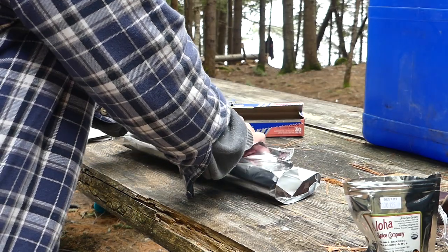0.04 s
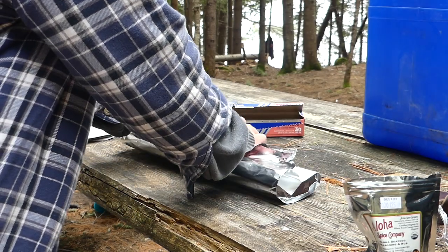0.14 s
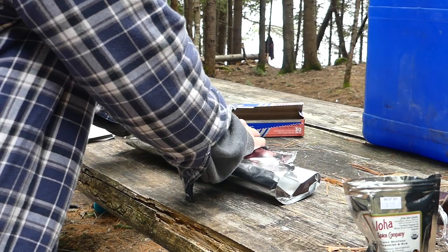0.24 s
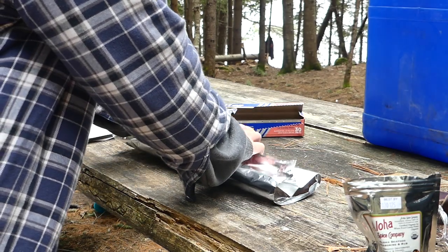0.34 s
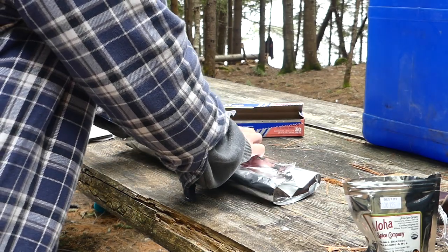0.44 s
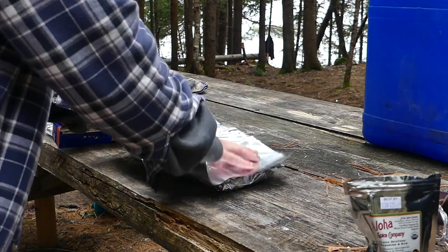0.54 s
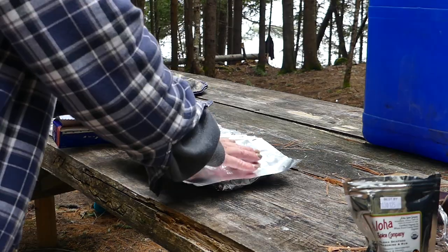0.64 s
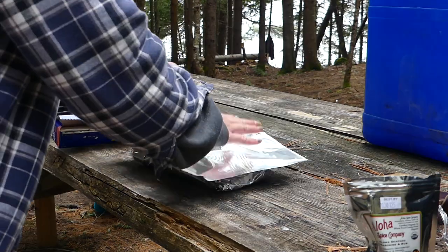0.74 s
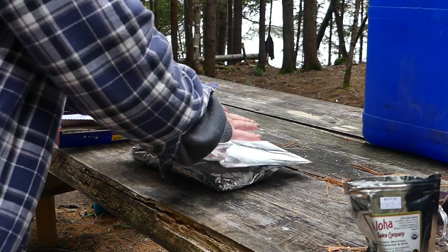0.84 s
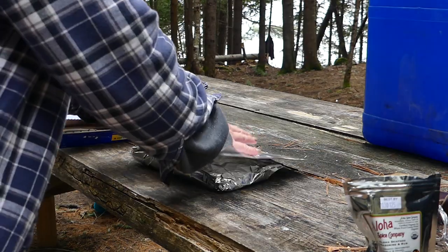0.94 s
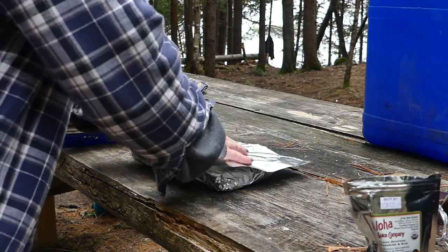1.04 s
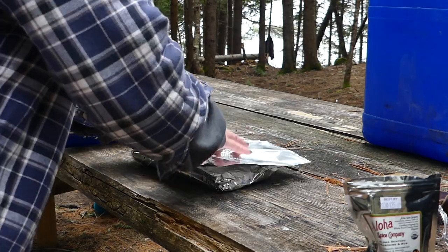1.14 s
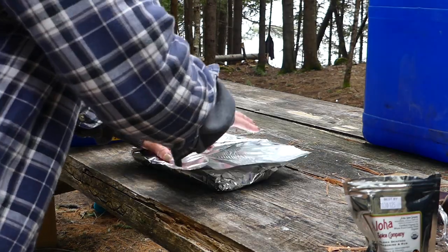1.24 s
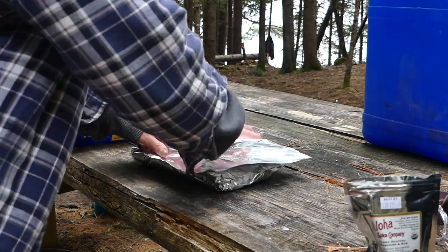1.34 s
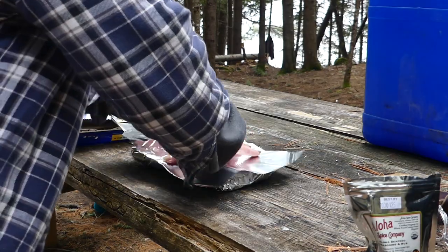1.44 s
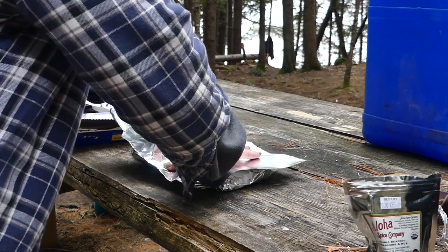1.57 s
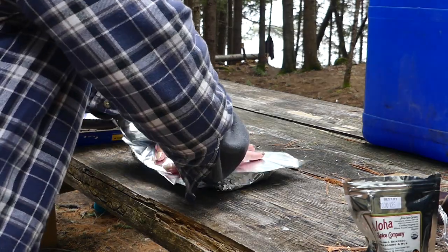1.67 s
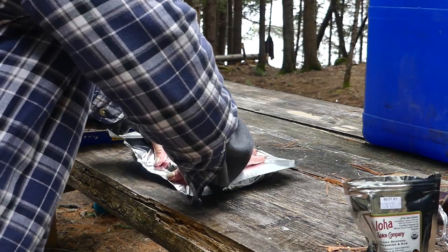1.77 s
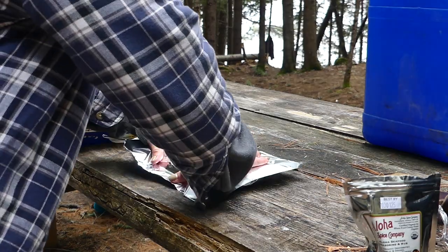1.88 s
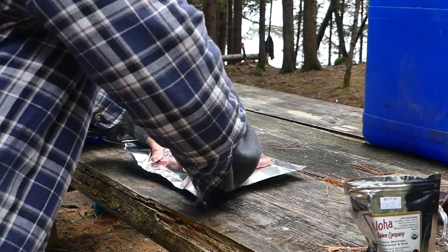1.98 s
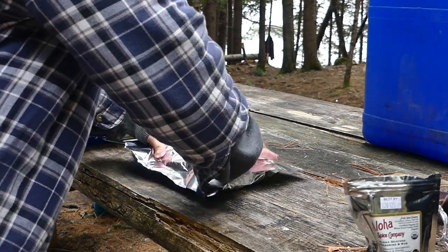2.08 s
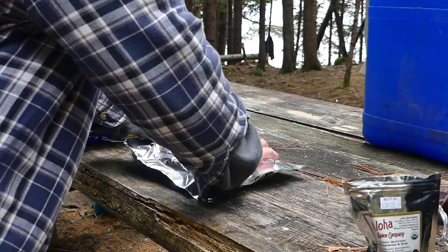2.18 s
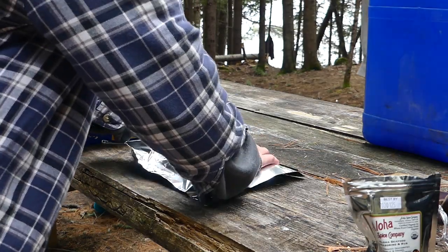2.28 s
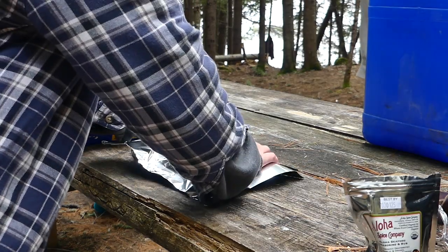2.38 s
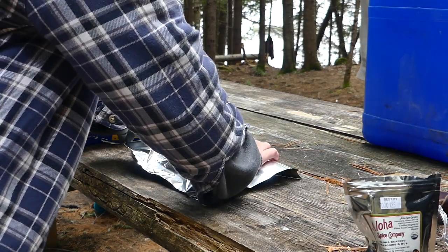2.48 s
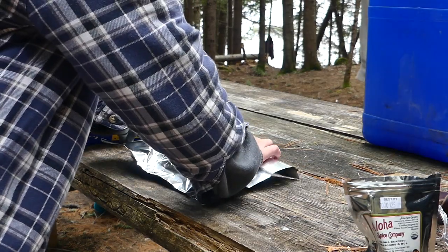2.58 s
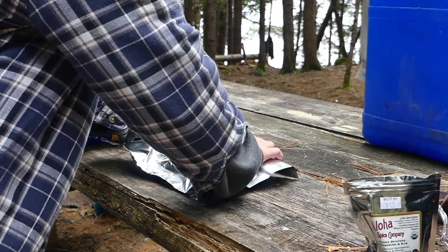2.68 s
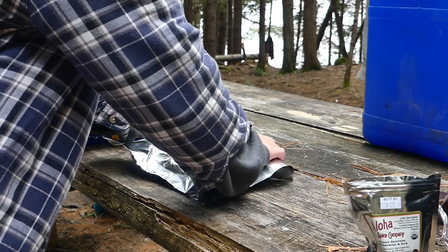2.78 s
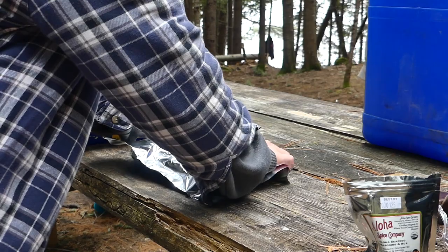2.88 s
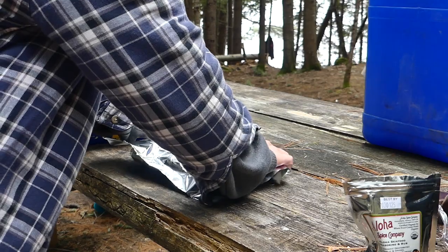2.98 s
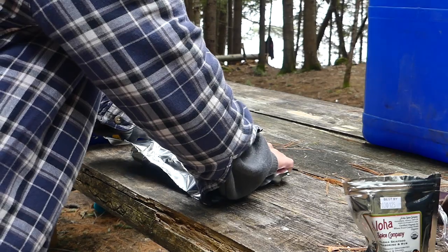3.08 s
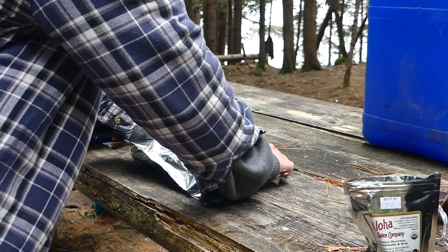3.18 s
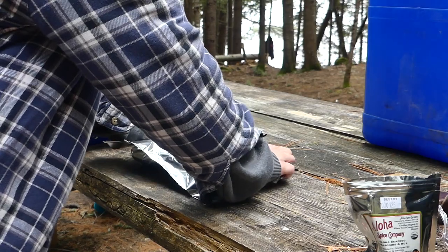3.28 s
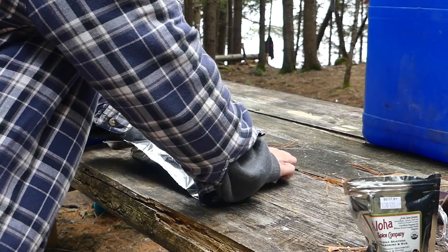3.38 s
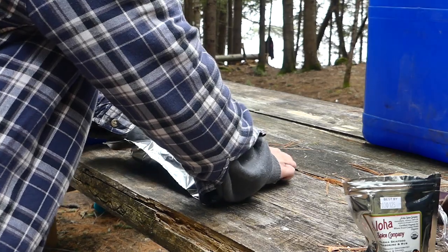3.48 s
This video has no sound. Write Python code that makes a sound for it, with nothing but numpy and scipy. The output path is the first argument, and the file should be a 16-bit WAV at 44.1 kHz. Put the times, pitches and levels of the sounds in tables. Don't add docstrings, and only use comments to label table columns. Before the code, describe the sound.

Aluminium foil crackles close to a nearly mono microphone outdoors. From 0 to 0.45 s, small tucks give duller crinkles, a sharp snap near 0.15 and hollow pops. After a brief lull, a bright sizzling rustle bursts at 0.5, with uneven smoothing strokes until 2.1. Folding then crackles, clicks and pings, with a hard crack at 2.43, softening from 3 to 3.5 over faint forest air and low wind rumble.

```python
import sys
import numpy as np
from scipy import signal
from scipy.fft import rfft, irfft
from scipy.io import wavfile
from scipy.ndimage import uniform_filter1d

SR = 44100
rng = np.random.default_rng(int(sys.argv[2]) if len(sys.argv) > 2 else 0)


def undo_db(level):
    steps = np.asarray(level, float) / 20
    return 10 ** steps


def unload_audio(sound):
    columns = np.transpose(np.atleast_2d(sound))
    steps = np.round(np.clip(columns, -1, 1) * 32767)
    wavfile.write(sys.argv[1], SR, steps.astype(np.int16))


N = 154350

# [f/Hz, level/dB]
AIR_SPECTRUM = [(35, -34), (60, -16.5), (579, -4), (1090, -4), (1550, -7), (2410, -8), (14200, -25.5),
                (16000, -50)]
# [t/s, length/s, start effort level/dB, end effort level/dB]
TUCK_STROKES = [
    (0.001, 0.067, -36, -36.5),
    (0.033, 0.044, -39.5, -33),
    (0.09, 0.023, -37.5, -37),
    (0.12, 0.021, -41, -28.5),
    (0.151, 0.048, -20.5, -50),
    (0.207, 0.05, -33.5, -37.5),
    (0.268, 0.078, -41, -30),
    (0.343, 0.084, -29, -36.5),
    (0.45, 0.08, -61, -54),
]
# [t/s, length/s, start effort level/dB, end effort level/dB]
SMOOTHING_STROKES = [(0.508, 0.058, -18.5, -21.5), (0.552, 0.053, -15, -20.5), (0.611, 0.065, -28.5, -26),
                     (0.682, 0.088, -25.5, -35.5), (0.761, 0.039, -29, -35.5), (0.807, 0.039, -39, -46),
                     (.86, .04, -61, -55), (0.902, .03, -44.5, -29), (0.936, 0.075, -24.5, -19.5),
                     (1.008, 0.087, -17.5, -22.5), (1.114, 0.11, -24.5, -33.5), (1.236, 0.03, -35, -27),
                     (1.272, 0.059, -34, -38), (1.33, 0.09, -39.5, -29), (1.432, 0.033, -29.5, -19.5),
                     (1.468, 0.1, -19, -30.5), (1.586, 0.11, -34, -32.5), (1.674, 0.088, -23.5, -24),
                     (1.764, 0.064, -30, -29.5), (1.808, 0.049, -35, -26), (1.869, 0.1, -27.5, -36),
                     (1.92, 0.12, -32.5, -32.5), (2.042, 0.109, -37, -32.5)]
# [t/s, length/s, start effort level/dB, end effort level/dB]
FOLDING_STROKES = [(2.161, 0.054, -28, -27.5), (2.216, 0.065, -25.5, -25), (2.283, 0.16, -29, -34),
                   (2.417, 0.12, -26.5, -36.5), (2.545, 0.077, -39.5, -32.5), (2.619, 0.025, -36, -35.5),
                   (2.704, 0.024, -41, -31), (2.729, 0.08, -33.5, -32.5), (2.816, 0.036, -33.5, -30),
                   (2.859, 0.068, -32, -34.5), (2.947, 0.095, -30, -34), (3.053, 0.18, -35, -41.5),
                   (3.181, 0.084, -35.5, -38), (3.262, 0.07, -37, -40), (3.343, 0.048, -39, -42.5),
                   (3.405, 0.047, -37.5, -44.5)]
# [t/s, pressure level/dB]
HAND_PRESSURE = [(0, 0.5), (.13, -2.5), (.15, -7.5), (.19, 2), (.49, -8), (.51, -16.5), (.78, -24),
                 (1.1, -10.5), (1.3, -12), (1.5, -15), (1.7, -7.5), (1.9, -6.5), (2.1, -8), (2.22, -9.5),
                 (2.37, -1.5), (2.63, -3), (2.95, -4.5), (3.5, 2.5)]
# [f/Hz, level/dB]
CRACKLE_SPECTRUM = [(300, -21.5), (1000, -11), (2500, -3), (5000, -0.5), (9000, -1.5), (12000, 0.5),
                    (15000, 0.5), (16500, -32)]
# [f/Hz, level/dB]
FACET_SPECTRUM = [(60, -30.5), (250, -8), (500, -11), (750, -5.5), (1500, 3.5), (2500, -2.5), (5000, -3.5),
                  (15000, -50.5)]
# [f/Hz, width/Hz, level/dB]
PACKET_RESONANCES = [(646, 294, 7.5), (825, 68, 6.5), (1500, 93, -1)]
# [t/s, peak level/dB]
CREASE_CLICKS = [(.0558, -23), (.3167, -28), (1.4293, -18), (1.498, -25), (1.676, -29), (1.713, -14),
                 (1.9152, -12), (1.926, -15), (1.965, -22), (2.177, -16), (2.2427, -10), (2.270, -16),
                 (2.277, -21), (2.295, -22), (2.598, -21), (2.6315, -16.5), (2.637, -18), (2.800, -21),
                 (2.8336, -15.5), (2.858, -11.5), (3.02, -27), (3.031, -30), (3.191, -17), (3.195, -23),
                 (3.205, -22), (3.212, -19), (3.256, -18), (3.3837, -24), (3.4091, -24), (3.4352, -18.5),
                 (3.447, -22), (3.4683, -16), (3.4815, -25), (3.489, -25)]
# [t/s, peak level/dB, low part level/dB]
CREASE_SNAPS = [(0.136, -12.5, -23), (0.149, -6, -32), (0.211, -22, -6), (0.267, -21, -4),
                (0.281, -20, -22), (0.349, -16, -14), (0.359, -20, -12), (0.4, -22, -10),
                (0.465, -27.5, -2), (0.509, -9, -25), (0.519, -6.5, -42), (0.937, -14, -21),
                (1.243, -19, -27), (1.267, -14, -20), (1.583, -18, -9), (1.806, -8, -43),
                (1.913, -6.5, -25), (2.069, -19.5, -35), (2.096, -14.5, -21), (2.226, -8, -20),
                (2.668, -20.5, -28), (2.696, -34, 2), (3.154, -16, -7.5), (3.313, -16.5, -13),
                (3.465, -26, 2)]
# [t/s, peak level/dB, f/Hz]
FACET_PINGS = [(0.1492, -17.5, 4740), (0.211, -29, 735), (0.229, -33, 1340), (0.267, -30, 900),
               (0.3168, -26, 4000), (0.4016, -24, 1250), (0.4639, -43, 4400), (0.4649, -36, 2150),
               (0.5188, -20, 2430), (0.5527, -28, 725), (0.9478, -32, 730), (1.0007, -25, 720),
               (1.0516, -30, 990), (1.1743, -40, 900), (1.2432, -26, 3830), (1.2671, -26, 2560),
               (1.2683, -33, 1160), (1.335, -34, 760), (1.494, -31, 1840), (1.5719, -26, 4220),
               (1.6762, -36, 735), (1.7341, -23, 3500), (2.0314, -30, 1610), (2.223, -27, 3010),
               (2.3686, -25, 2200), (2.4729, -24, 4300), (2.5412, -26, 2490), (2.624, -26, 4000),
               (2.6305, -30, 3190), (2.6375, -37, 4430), (2.6699, -36, 4130), (2.6969, -28.5, 2140),
               (2.7238, -31, 4050), (2.7273, -31, 635), (2.8934, -23, 1460), (2.9069, -25.5, 2240),
               (3.0003, -28, 2580), (3.0313, -25, 4200), (3.071, -25.5, 786), (3.155, -26, 1420),
               (3.1897, -28, 1640), (3.2127, -27, 1540), (3.2356, -29.5, 816), (3.3833, -29, 1520),
               (3.4681, -32, 3620), (3.4816, -30, 1530)]
# [t/s, peak level/dB, f/Hz, ring T60/s]
FACET_POPS = [(0.156, -8.5, 870, 0.063), (0.324, -8, 1500, 0.025), (0.36, -21, 950, 0.03),
              (0.368, -12, 1270, 0.04), (0.388, -16, 1340, 0.04), (0.431, -10.5, 840, 0.026),
              (1.084, -18, 1860, 0.021), (1.574, -7, 920, 0.013), (1.78, -30, 1740, 0.03),
              (1.887, -8.5, 2030, 0.044), (2.031, -17, 1120, 0.035), (2.426, -7, 1225, 0.053),
              (2.512, -17.5, 793, 0.066), (2.542, -9, 1510, 0.033), (2.726, -12, 1190, 0.048),
              (3.047, -2.5, 2150, 0.011), (3.121, -9.5, 1326, 0.04), (3.188, -26, 1670, 0.03)]
# [t/s, level/dB]
WIND_GUSTS = [(.5, -66), (.58, -43), (.8, -65), (1.2, -47), (1.48, -44.5), (1.9, -63), (2.1, -47.5),
              (2.4, -57), (2.9, -57), (3.15, -48), (3.5, -54)]
# [f/Hz, side level under mid/dB]
SIDE_SPECTRUM = [(30, -18), (120, -18), (500, -18.5), (2000, -30.5), (16000, -46)]


def evened(x):
    return x / np.sqrt(np.mean(x ** 2) + 1e-20)


def colour(x, spectrum):
    f, db = np.transpose(spectrum)
    hz = abs(np.fft.fftfreq(4096, 1 / SR))
    log_gain = np.interp(np.log(hz + 1), np.log(f), db) * np.log(10) / 20
    impulse = np.fft.ifft(np.exp(np.conj(signal.hilbert(log_gain)))).real[:2048]
    return signal.oaconvolve(x, impulse)[:len(x)]


def drift(span_s):
    size = max(round(span_s * SR), 1)
    once = uniform_filter1d(rng.standard_normal(N), size)
    return evened(uniform_filter1d(once, size))


def forest():
    return undo_db(-42.5) * evened(colour(rng.standard_normal(N), AIR_SPECTRUM))


def effort():
    attack_s, release_t60_s = 0.003, 0.08
    power = np.zeros(N + SR)
    for start, length, from_db, to_db in TUCK_STROKES + SMOOTHING_STROKES + FOLDING_STROKES:
        t = np.arange(0, length + 0.1, 1 / SR)
        glide_db = np.interp(t, [0, length], [from_db, to_db])
        release_db = -60 * np.maximum(t - length, 0) / release_t60_s
        stroke = np.minimum(t / attack_s, 1) * undo_db(glide_db + release_db)
        power[round(start * SR):][:len(t)] += stroke ** 2
    return np.sqrt(power[:N])


def creases(per_s, spread_db, t60_s, spectrum, patches=40):
    draw = rng.random((N, 3))
    t = np.arange(2048) / SR
    happens = draw[:, 0] < per_s / SR
    size = happens * undo_db(spread_db * np.minimum(-np.log(draw[:, 1]), 4))
    patch = (draw[:, 2] * patches).astype(int)
    bands_hz = np.geomspace(500, 16000, num=12)
    out = np.zeros(N)
    for k, noise in enumerate(rng.standard_normal((patches, len(t)))):
        patch_t60_s = t60_s * (0.54 + 0.97 * k / patches)
        ring = evened(noise * undo_db(-60 * t / patch_t60_s))
        patch_db = 4.5 * rng.standard_normal(len(bands_hz))
        ring = evened(colour(ring, np.transpose([bands_hz, patch_db])))
        out += signal.oaconvolve(size * (patch == k), ring)[:N]
    return evened(colour(out, spectrum))


def foil():
    press_db = np.interp(np.arange(N) / SR, *np.transpose(HAND_PRESSURE))
    clumps = drift(0.005)
    hand = effort()
    sparse = creases(per_s=5000, spread_db=2.6, t60_s=0.005, spectrum=CRACKLE_SPECTRUM)
    facet_gain = undo_db(2.5 + press_db + 1.2 * drift(0.03))
    facets = facet_gain * creases(per_s=900, spread_db=1, t60_s=0.026, spectrum=FACET_SPECTRUM)
    tick_spectrum = [(400, -20), (1500, 0), (9000, -5)]
    ticks = creases(per_s=260, spread_db=1.9, t60_s=0.006, spectrum=tick_spectrum)
    ticks *= undo_db(-5 + 0.9 * press_db)
    dense = np.clip((20 * np.log10(hand + 1e-9) + 34) / 20, 0, 0.75)
    sizzle = evened(colour(rng.standard_normal(N), CRACKLE_SPECTRUM))
    crackle = np.sqrt(1 - dense) * sparse + np.sqrt(dense) * sizzle
    return hand * undo_db(0.8 * clumps) * (undo_db(-0.5) * crackle + facets + ticks)


def turned(x):
    z = signal.stft(x, nperseg=512)[2]
    swing = uniform_filter1d(rng.standard_normal(z.shape), size=24, axis=0)
    swing = uniform_filter1d(swing, size=5, axis=1)
    return signal.istft(z * undo_db(1.1 * evened(swing) - 0.5), nperseg=512)[1][:N]


def hollow(x):
    hz = np.fft.rfftfreq(N, 1 / SR)
    lift_db = sum(db / (1 + (2 * (hz - f) / width) ** 2) for f, width, db in PACKET_RESONANCES)
    return irfft(rfft(x) * undo_db(lift_db), N)


def clicks():
    rise_s, t60_s, level_db = 0.0011, 0.016, -1
    t = np.arange(1024) / SR
    out = np.zeros(N + 1024)
    for (s, db), noise in zip(CREASE_CLICKS, rng.standard_normal((len(CREASE_CLICKS), len(t)))):
        shape = np.minimum(t / rise_s, 1) * undo_db(level_db + db - 60 * t / t60_s)
        out[round(s * SR):][:len(t)] += shape * noise
    return colour(out, CRACKLE_SPECTRUM)[:N]


def snaps():
    rise_s, ring_t60_s, tick_t60_s, tick_db = 0.0019, 0.044, 0.0015, -2
    t = np.arange(4096) / SR
    high, low = np.zeros(N + 4096), np.zeros(N + 4096)
    noises = rng.standard_normal((len(CREASE_SNAPS), 2, len(t)))
    for (s, db, low_db), (bright, dull) in zip(CREASE_SNAPS, noises):
        shape = np.minimum(t / rise_s, 1) * undo_db(db - 60 * t / ring_t60_s)
        shape *= 1 + undo_db(tick_db - 60 * t / tick_t60_s)
        at = round(s * SR)
        high[at:at + len(t)] += shape * evened(bright)
        low[at:at + len(t)] += shape * dull * undo_db(low_db)
    return undo_db(-6) * (colour(high, CRACKLE_SPECTRUM) + undo_db(11.5) * colour(low, FACET_SPECTRUM))[:N]


def pings():
    rise_s, t60_s, extra_cycles, level_db = 0.0013, 0.016, 9.3, 3.5
    t = np.arange(2048) / SR
    out = np.zeros(N + 2048)
    for (s, db, hz), (turn, apart) in zip(FACET_PINGS, rng.random((len(FACET_PINGS), 2))):
        upper_hz = hz * (1.09 + 0.17 * apart)
        tones = np.sin(2 * np.pi * hz * t) + 0.21 * np.sin(2 * np.pi * (upper_hz * t + turn))
        fade_db = -60 * t / (t60_s + extra_cycles / hz)
        out[round(s * SR):][:len(t)] += np.minimum(t / rise_s, 1) * undo_db(level_db + db + fade_db) * tones
    return out[:N]


def pops():
    partials = [(1, 0.57), (1.13, 0.12), (1.62, 0.29), (3.1, 0.055)]
    t = np.arange(4096) / SR
    out = np.zeros(N + 4096)
    for s, db, hz, t60_s in FACET_POPS:
        tones = sum(share * np.sin(2 * np.pi * hz * ratio * t) for ratio, share in partials)
        out[round(s * SR):][:len(t)] -= undo_db(-11 + db - 60 * t / max(t60_s, 0.003)) * tones
    crack_s, crack_db = 2.4261, -1.5
    u = t / 0.00009
    out[round(crack_s * SR):][:len(t)] -= undo_db(crack_db) * (1 - u) * np.exp(-u / 2)
    return colour(out[:N], [(200, -28), (750, 0)])


def breeze():
    band = signal.butter(2, [16, 45], "band", fs=SR, output="sos")
    rumble = signal.sosfilt(band, rng.standard_normal(N))
    wind_db = np.interp(np.arange(N) / SR, *np.transpose(WIND_GUSTS), left=-78)
    return undo_db(-2.5 + wind_db + 2 * drift(0.039)) * evened(rumble)


def scene():
    sheet = hollow(turned(foil()) + snaps())
    mid = sheet + pops() + pings() + clicks() + forest() + breeze()
    scatter = rng.standard_normal(400) * undo_db(-60 * np.arange(400) / 400)
    scattered = signal.oaconvolve(mid, scatter / np.linalg.norm(scatter))[:N]
    flicker = drift(0.044) * undo_db(6.3 * drift(0.037))
    side = colour(flicker * scattered, SIDE_SPECTRUM)
    return np.array([mid + side, mid - side])


def roll_off(x):
    return signal.sosfilt(signal.butter(12, 16640, fs=SR, output="sos"), x)


def record(dry):
    hz = np.fft.rfftfreq(N, 1 / SR)
    plateau = 0.5 * (np.tanh((hz - 6485) / 500) - np.tanh((hz - 8536) / 150))
    notch_db = 15 * np.exp(-(2 * (hz - 5930) / 75) ** 2)
    edge_db = np.clip(hz - 15650, 0, 600) * 0.14
    gain = undo_db(7.5 * plateau - 2.5 - notch_db - edge_db)
    return roll_off(irfft(rfft(dry) * gain, N))


dry = scene()
out = record(dry)
unload_audio(out)
```